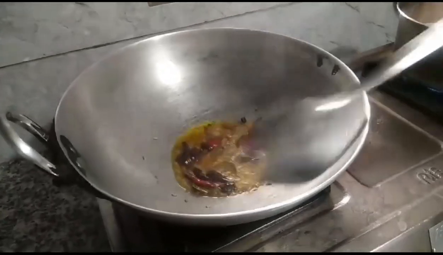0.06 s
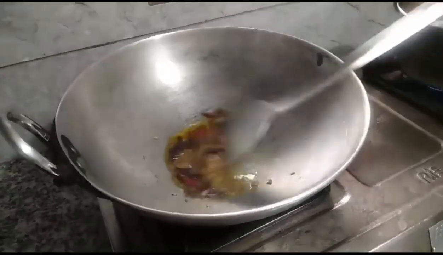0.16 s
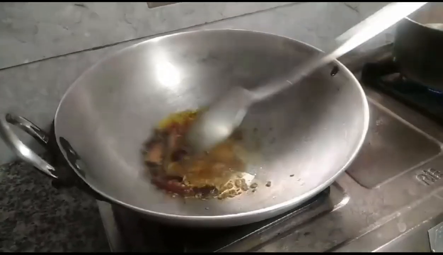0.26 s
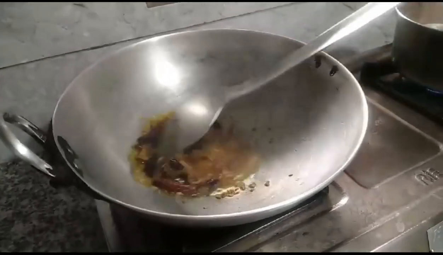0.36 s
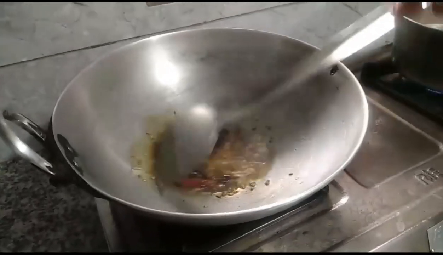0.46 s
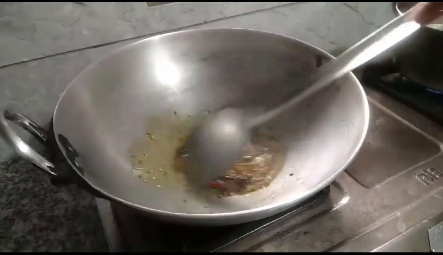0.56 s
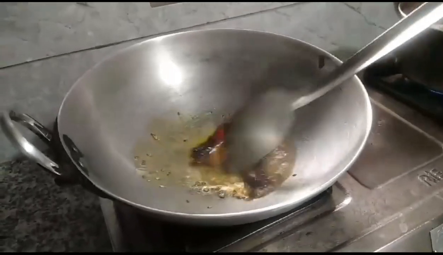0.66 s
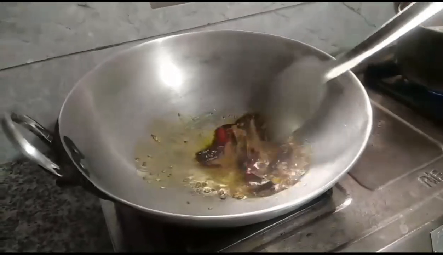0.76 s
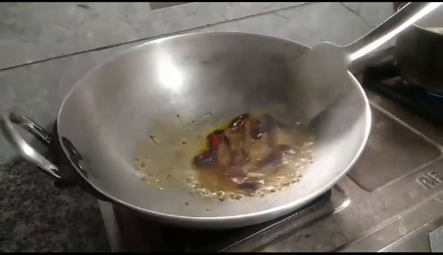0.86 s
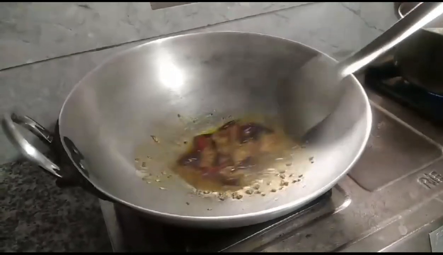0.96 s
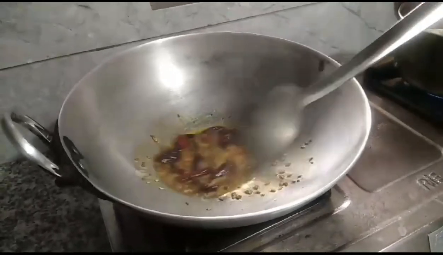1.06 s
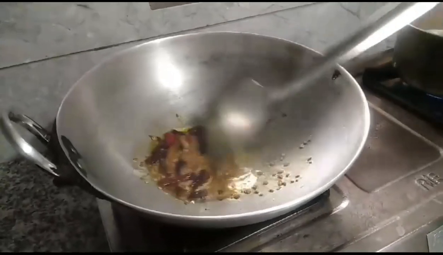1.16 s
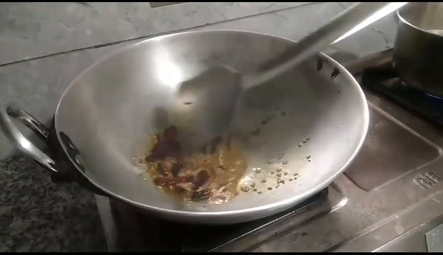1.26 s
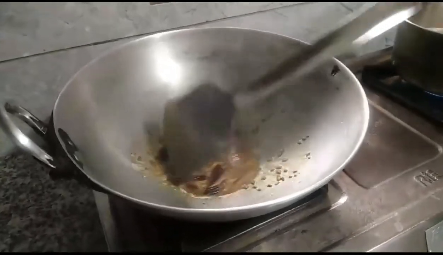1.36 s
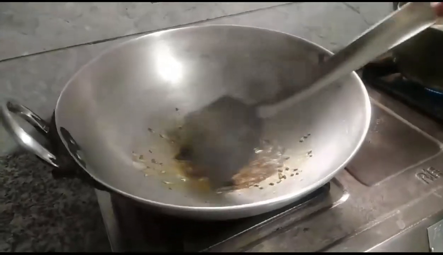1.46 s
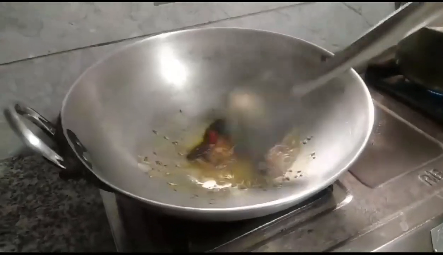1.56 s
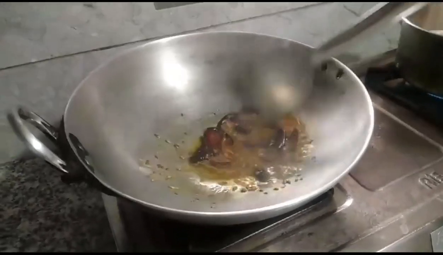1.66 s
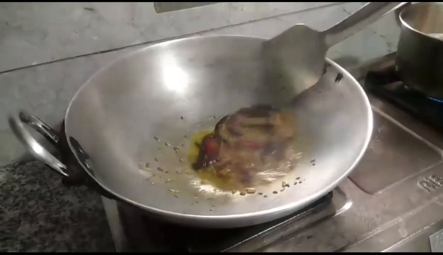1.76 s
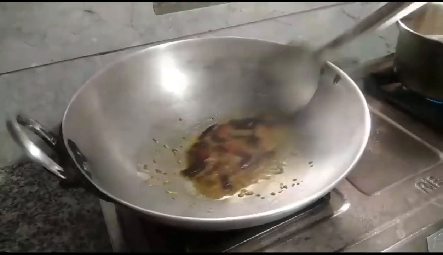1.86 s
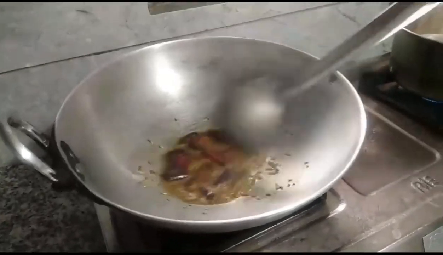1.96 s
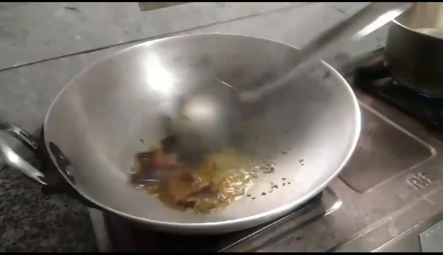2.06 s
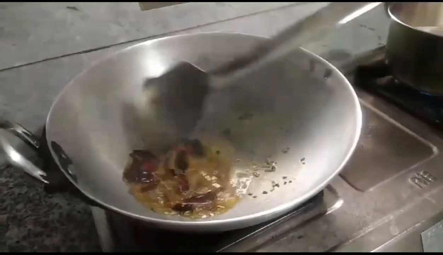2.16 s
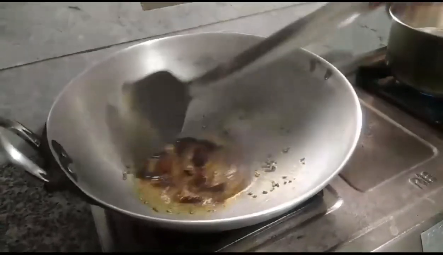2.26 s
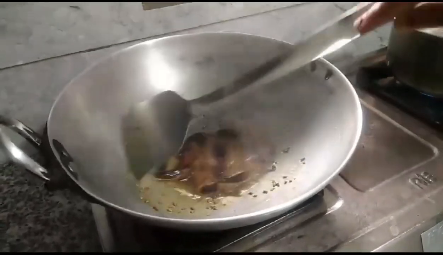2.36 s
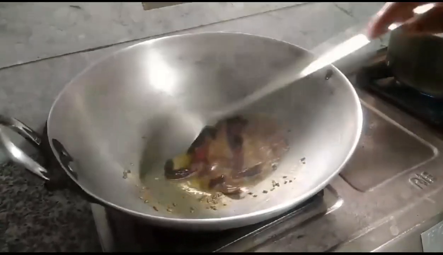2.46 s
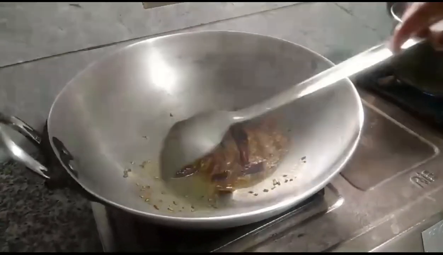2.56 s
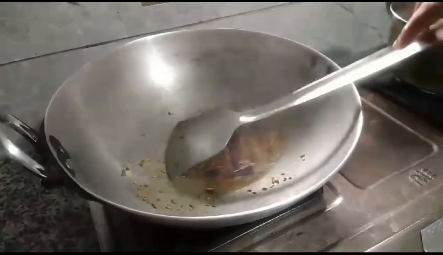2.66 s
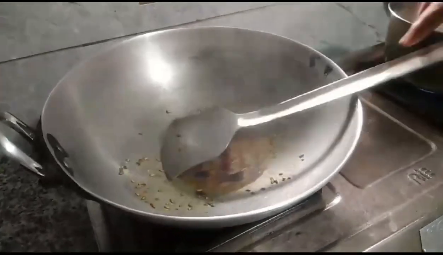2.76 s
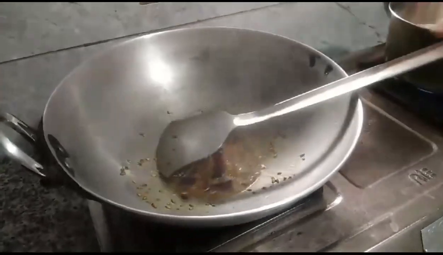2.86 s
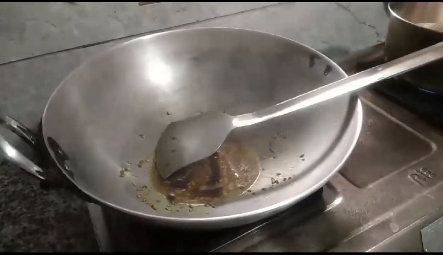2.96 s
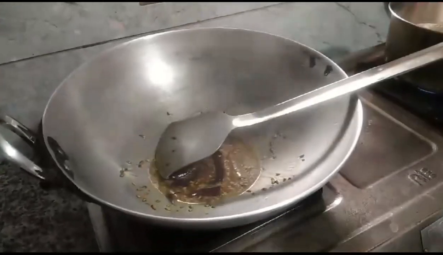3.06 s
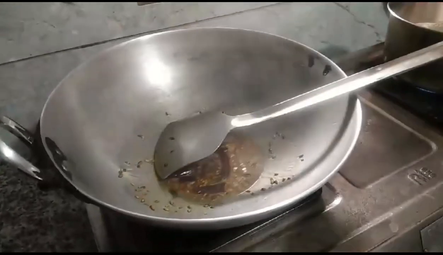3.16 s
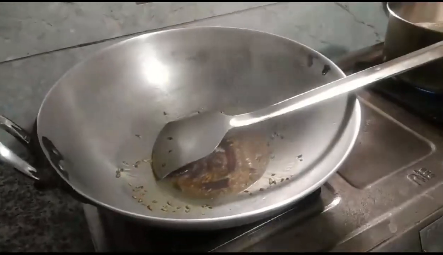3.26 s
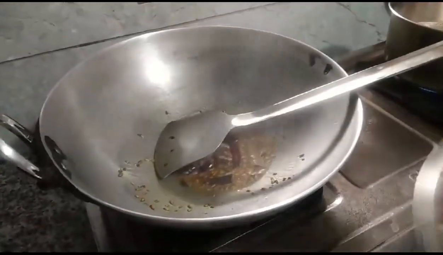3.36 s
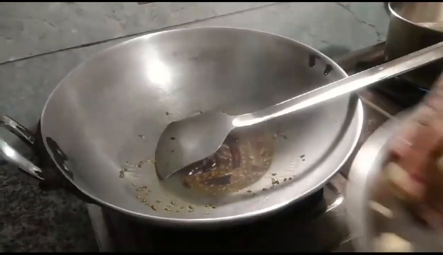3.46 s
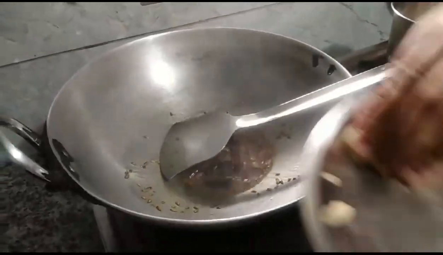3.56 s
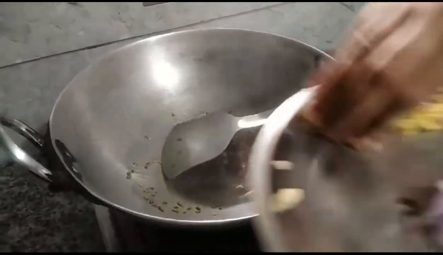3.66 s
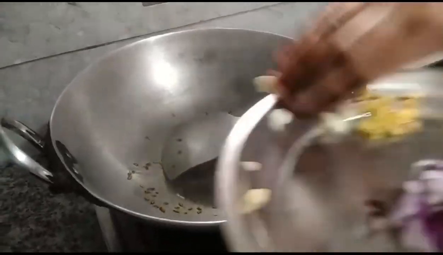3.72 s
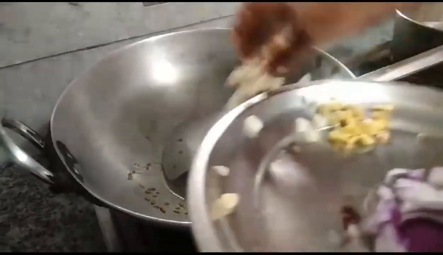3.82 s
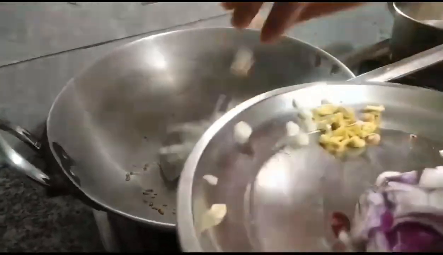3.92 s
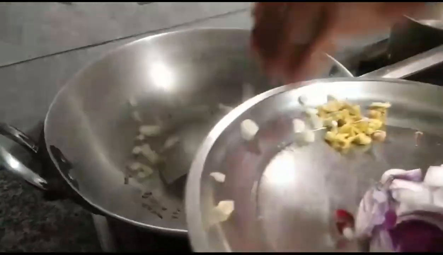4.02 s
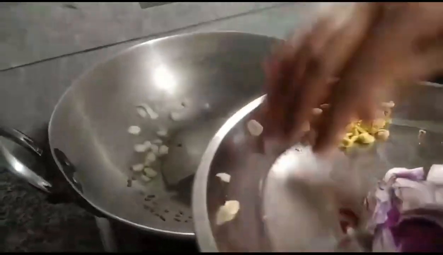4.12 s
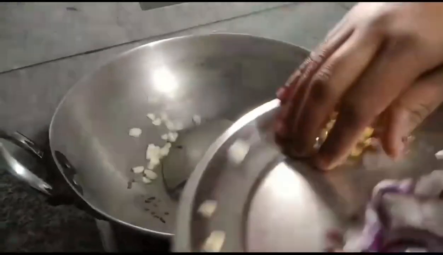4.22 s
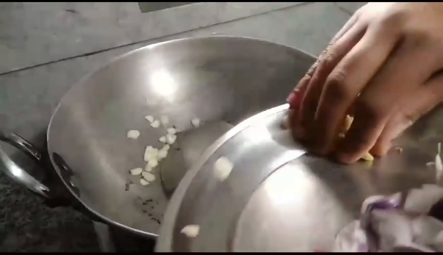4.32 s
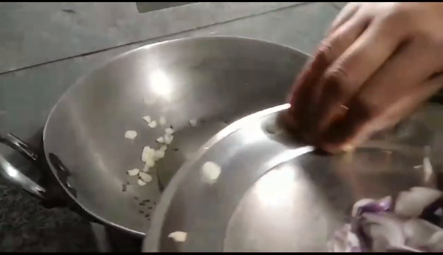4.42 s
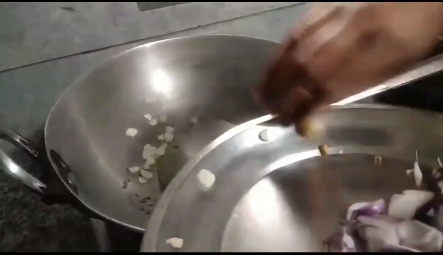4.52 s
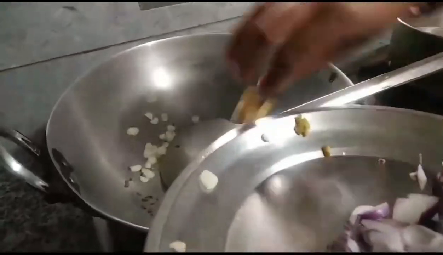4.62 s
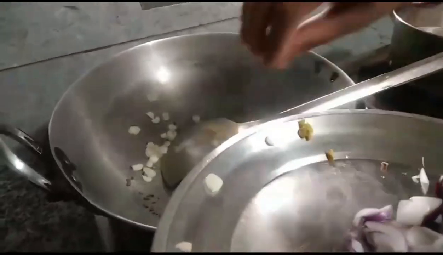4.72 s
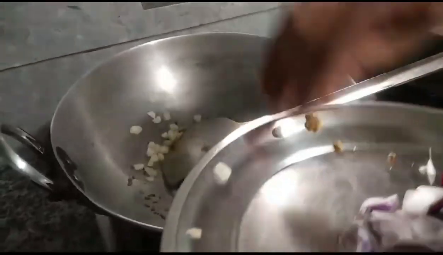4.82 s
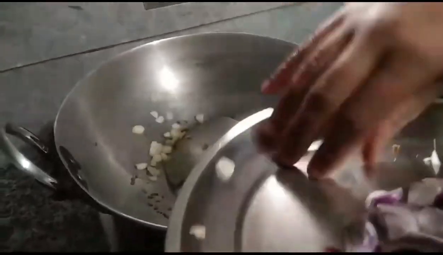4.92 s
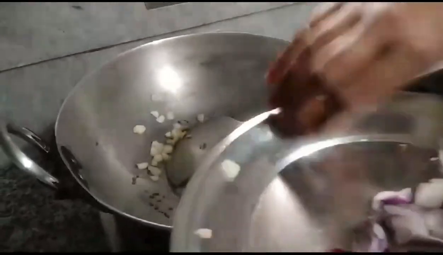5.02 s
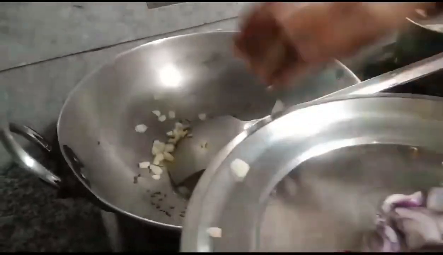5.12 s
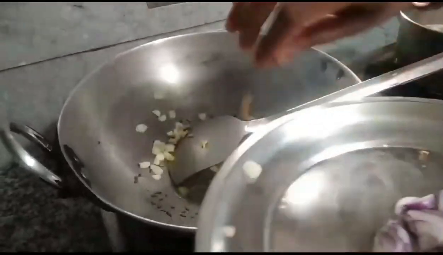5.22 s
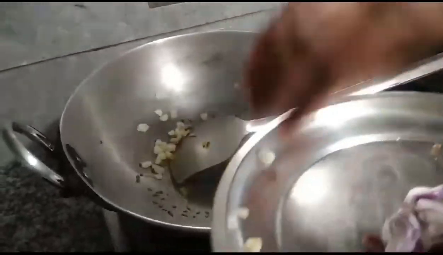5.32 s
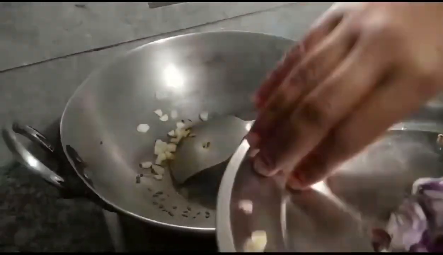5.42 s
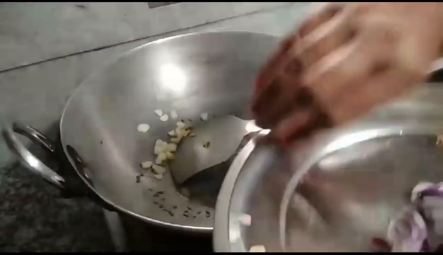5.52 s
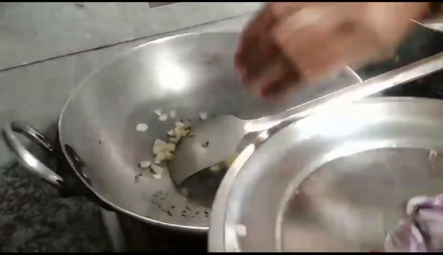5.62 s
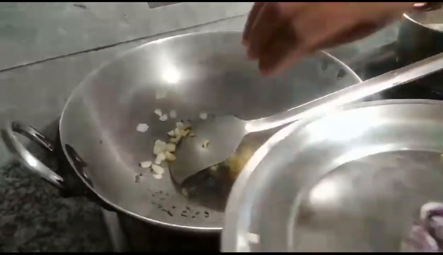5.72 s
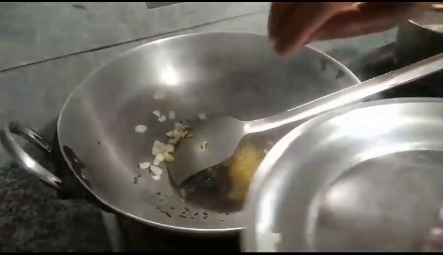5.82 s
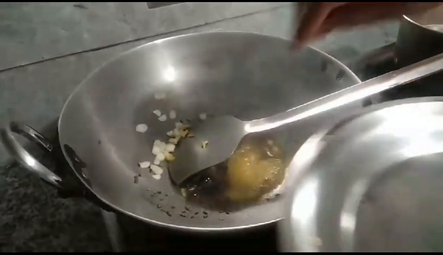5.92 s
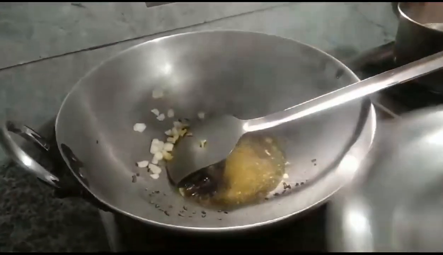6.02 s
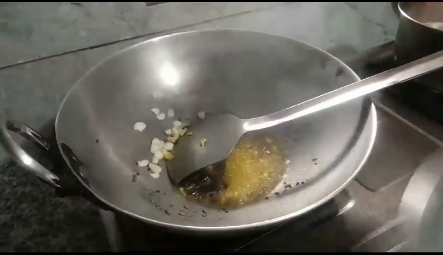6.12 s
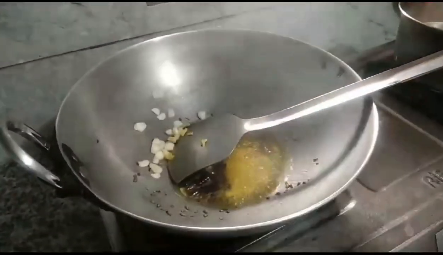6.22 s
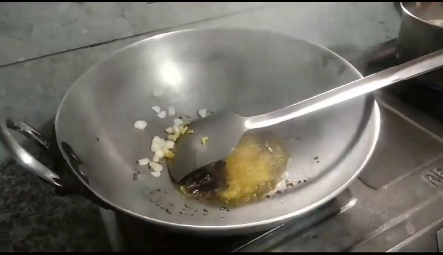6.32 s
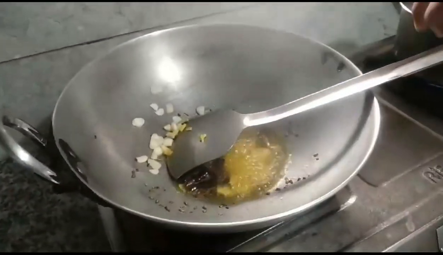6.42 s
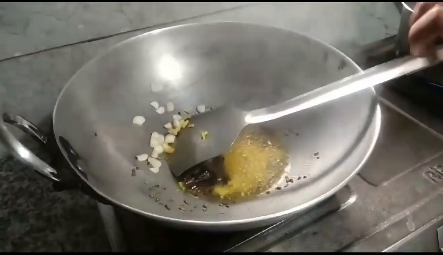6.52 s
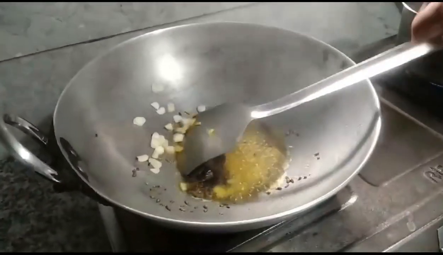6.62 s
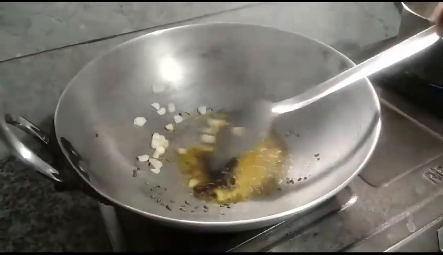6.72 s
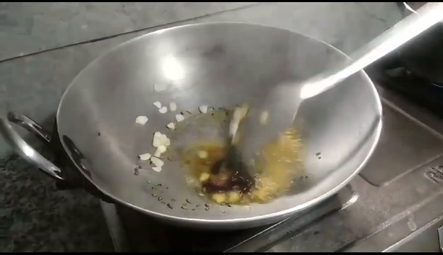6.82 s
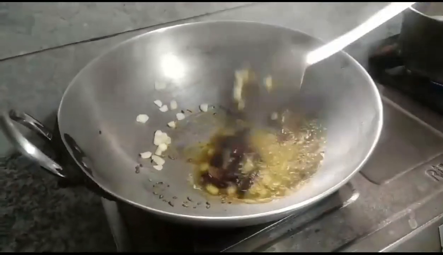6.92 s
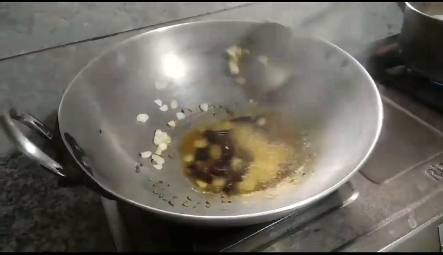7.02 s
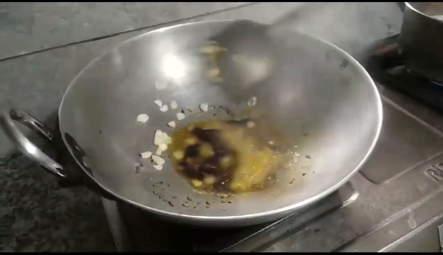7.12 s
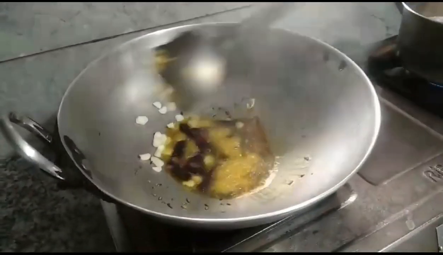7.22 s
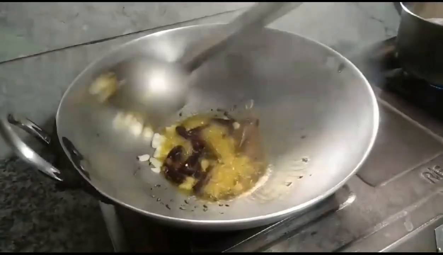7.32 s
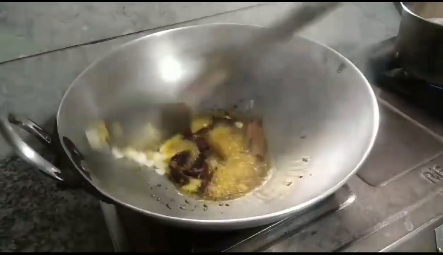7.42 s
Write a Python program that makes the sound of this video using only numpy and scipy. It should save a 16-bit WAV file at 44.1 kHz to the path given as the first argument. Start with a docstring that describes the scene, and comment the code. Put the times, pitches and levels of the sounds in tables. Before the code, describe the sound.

Close up in a small kitchen, a steel spatula stirs a wok with bright scrapes and clinks over fizzing, spitting oil. After a quick metallic rattle the spatula rests, and the frying swells in crackling bursts as chopped pieces fall in. Near the end a metal plate rasps and rings on the counter, then the spatula strikes and scrapes again. A faint low drone and burner rush lie behind everything.

```python
"""Spices sizzling in a steel wok on a gas burner, close to a stereo pair of microphones in a small kitchen.
Moisture boils in the hot oil as countless tiny bubbles; a steel spatula scrapes, knocks and is dropped
in the pan, ringing both bowl and blade. Chopped garlic and ginger patter in and the oil sizzles up.
A steel plate judders over the stone counter, and the stirring starts again.
Behind it all lie the low rush of the flame and the room, and a wavering drone."""
import sys
import numpy as np
from scipy import signal
from scipy.fft import rfft, irfft
from scipy.io import wavfile
from scipy.ndimage import uniform_filter1d

SR = 44100
rng = np.random.default_rng(int(sys.argv[2]) if len(sys.argv) > 2 else 0)


def wav_record(signal):
    """Record a signal, one row per channel, as 16-bit PCM in the file named by sys.argv[1]."""
    frames = np.transpose(np.atleast_2d(signal))
    bounded = np.clip(frames, -1, 1)
    # unit amplitude maps onto the largest positive 16-bit level
    quanta = np.round(bounded * 32767).astype(np.int16)
    wavfile.write(sys.argv[1], SR, quanta)


N = 329868


def amp(db):
    return 10 ** (np.asarray(db) / 20)


def unit_rms(x):
    return x / np.sqrt(np.mean(x ** 2) + 1e-20)


def curve_at(points, hz):
    """Joins (frequency, value) points by straight lines on a log-frequency axis."""
    f, value = np.transpose(points)
    return np.interp(np.log(hz + 1), np.log(f + 1), value)


def pan(db):
    """Gains that put the left microphone db above the right."""
    return amp(np.array([[db], [-db]]) / 2)


def add(mix, start_s, sound):
    part = mix[:, max(round(start_s * SR), 0):][:, :sound.shape[1]]
    part += sound[:, :part.shape[1]]


def decay(t, t60):
    return np.exp(-np.log(1000) * t / t60)


def swell(t, hold, rise, fall):
    """Grows until t = 0, holds, then dies away."""
    return np.exp(np.minimum(t, 0) / rise - np.maximum(t - hold, 0) / fall)


def tint(x, spectrum):
    """Colours a signal, at unit RMS; beyond the ends of the spectrum it falls away."""
    hz = np.fft.rfftfreq(x.shape[-1], 1 / SR)
    skirts = 1 / (1 + (hz / (2 * spectrum[-1][0])) ** 4) / (1 + (spectrum[0][0] / 2 / (hz + 1)) ** 4)
    return unit_rms(irfft(rfft(x) * amp(curve_at(spectrum, hz)) * skirts, x.shape[-1]))


def resonate(x, peaks, valley_db):
    """Broad resonances (frequency [Hz], width [Hz], level [dB]) standing over darker valleys."""
    hz = np.fft.rfftfreq(x.shape[-1], 1 / SR)
    power = sum(amp(db) ** 2 / (1 + ((hz - f) / width) ** 2 * 2) ** 2 for f, width, db in peaks)
    return unit_rms(irfft(rfft(x) * np.sqrt(power + amp(valley_db) ** 2), x.shape[-1]))


# How alike the room sounds at the two microphones: (frequency [Hz], coherence [0-1])
COHERENCE = [(20, 0.81), (60, 1), (300, 0.95), (640, 0.98), (1500, 0.082), (15000, 0.043)]
def diffuse(size):
    """White noise at two microphones: alike in the bass, unrelated in the treble."""
    a, b = rfft(rng.standard_normal((2, size)))
    same = np.clip(curve_at(COHERENCE, np.fft.rfftfreq(size, 1 / SR)), -1, 1)
    return irfft(np.array([a, same * a + np.sqrt(1 - same ** 2) * b]), size)


def clicks(size, per_s, spread_db):
    """Random clicks, mostly small with a few large ones."""
    height = amp(spread_db * np.minimum(rng.exponential(1, size), 5))
    return unit_rms(height * rng.choice([-1, 1], size) * (rng.random(size) < per_s / SR))


def grains(per_s, spread_db, pop_s, tail_s, tail_share):
    """Random tiny pops, each followed by a short wash of reflections."""
    t = np.arange(SR // 8) / SR
    energy = clicks(N, per_s, spread_db) ** 2
    pop, tail = np.exp(-t / pop_s), np.exp(-t / tail_s)
    envelope = (1 - tail_share) * pop / pop.sum() + tail_share * tail / tail.sum()
    power = signal.oaconvolve(energy, envelope)[:N]
    return diffuse(N) * np.sqrt(abs(power))


def ringing(modes, t, scatter_db=1.5):
    """Dying sines, weighted by the point of contact; high ones reach the microphones out of step."""
    out = np.zeros((2, len(t)))
    for hz, db, t60 in modes:
        phase = rng.random() + rng.uniform(-0.26, 0.56, (2, 1)) * (1 - curve_at(COHERENCE, hz))
        level = amp(db + scatter_db * rng.standard_normal())
        out += level * decay(t, t60) * np.sin(2 * np.pi * (hz * t + phase))
    return out


def contact_colour(x, ripple_db, spacing_hz):
    """The point of contact wakes some groups of modes and misses others."""
    hz = np.fft.rfftfreq(x.shape[-1], 1 / SR)
    groups = np.minimum(rng.standard_normal(400), 1)
    ripple = np.interp(hz / spacing_hz, np.arange(len(groups)), groups)
    return irfft(rfft(x) * amp(ripple_db * ripple * hz / (hz + 500)), x.shape[-1])


def shimmer(x, depth_db, width_hz, hold_s):
    """Narrow bands of pitch swell and fade at random, giving a patchy shimmer."""
    frames = signal.stft(x, nperseg=1024, noverlap=768)[2]
    field = rng.standard_normal(frames.shape[1:])
    for axis, span in enumerate([width_hz * 1024 / SR, hold_s * SR / 256]):
        field = uniform_filter1d(field, max(round(span), 1), axis=axis)
    gain = amp(depth_db * np.minimum(unit_rms(field), 2))
    return unit_rms(signal.istft(frames * gain, nperseg=1024, noverlap=768)[1][:, :x.shape[1]])


def off_centre(x, left_lag_s):
    """A sound from one side reaches one microphone a moment after the other."""
    t = np.arange(N) / SR
    return np.array([np.interp(t - round(left_lag_s * SR) / SR, t, x[0]), x[1]])


# Room tone with the gas flame: (frequency [Hz], level [dB])
ROOM_TONE = [(22, -2), (40, 4), (75, 3.5), (120, -2), (200, -10.5), (300, -9.5), (390, -7), (600, -5.5),
             (1100, -18), (2500, -16.5), (5000, -18.5)]
# Swells of the low drone: (time [s], hold [s], level [dB], pitch [Hz])
DRONE_SWELLS = [(0.028, 0.035, -51.5, 58.6), (0.96, 0.063, -47.5, 62.6), (2.54, 0.073, -57.5, 64),
                (3.228, 0.417, -60.5, 69.5), (6.48, .02, -63, 63)]
def background(drone_hz=61, drone_db=-76, waver_rad=0.41, room_db=-60, hum_hz=380, hum_db=-69):
    """A drone wavers and swells over the rush of flame and room; a faint hum comes and goes above it."""
    t = np.arange(N) / SR
    flutter, drift = tint(rng.standard_normal((2, N)), [(2, -2), (7, 7), (20, -14)])
    swells = [(amp(db) * swell(t - s, hold, rise=0.057, fall=0.322), hz)
              for s, hold, db, hz in DRONE_SWELLS]
    level = amp(drone_db) + sum(size for size, hz in swells)
    pitch = drone_hz + sum(size * (hz - drone_hz) for size, hz in swells) / level
    drone = np.sqrt(2) * level * np.sin(2 * np.pi * np.cumsum(pitch) / SR + waver_rad * drift)
    hum = amp(hum_db) * resonate(diffuse(N), [(hum_hz, 14, 0)], valley_db=-80)
    room = amp(room_db) * tint(diffuse(N), ROOM_TONE)
    return drone * (1 + 0.54 * flutter) + hum + room


# Wok on burner, plate on counter, mid-image: (time [s], pitch [Hz], level [dB], t60 [s], rise [s])
BUMPS = [(0.036, 660, -39, 0.069, .002), (0.035, 382, -45, 0.15, .002), (0.048, 161.7, -61.5, 0.96, .002),
         (0.15, 1580, -57, 0.74, .005), (0.293, 1183, -58, .35, .002), (1.511, 174.7, -56.5, 1, .002),
         (2.43, 230, -60, 0.13, .002), (2.81, 31.9, -46, 0.23, .002), (2.885, 263, -38, 0.18, .004),
         (3.344, 810, -38, 0.039, 0.0017), (4.569, 156, -47, 0.09, .002), (5.905, 616, -30, 0.087, 0.0043),
         (5.93, 146.3, -45.5, 0.5, .002), (6.05, 244, -39, 0.22, .004), (6.363, 435.4, -28.5, 0.36, 0.02),
         (7.125, 710, -47.5, 0.98, .002), (7.124, 162, -57, 0.44, .004)]
def bumps(rattle=0.55):
    """A soft blow sets off one low, slightly rattling resonance."""
    out, t = np.zeros((2, N)), np.arange(SR) / SR
    for s, hz, db, t60, rise in BUMPS:
        noise = tint(diffuse(SR), [(hz / 2, -25), (hz, 0), (hz * 2, -25)])
        tone = np.sin(2 * np.pi * hz * t) + rattle * noise
        add(out, s, amp(db) * tone * decay(t, t60) * (1 - np.exp(-t / rise)))
    return out


# The plate's body, fine stone grit under its rim, and coarser grains: (frequency [Hz], level [dB])
PLATE_BODY = [(60, -30), (130, -6), (250, 2.5), (4500, 1), (7000, 6)]
GRIT = [(2500, -27), (4500, -33), (6500, 12), (9000, 17), (14000, -19)]
RASP = [(500, -3.5), (1500, -24), (2500, -3), (4500, -4), (9000, -7.5)]
# Its resonances, damped by hand and food: (frequency [Hz], width [Hz], level [dB])
PLATE_DAMPED_MODES = [(147, 22, 1), (275, 20, 1.5), (437, 31, 1), (579, 44, 3), (660, 110, -0.5),
                      (890, 71, -6), (1060, 124, -1.5), (1362, 53, 6), (1680, 134, 1), (1970, 35, 0.5),
                      (2092, 90, 1.5), (2414, 34, 6), (2590, 31, 4), (2740, 16, 6), (3083, 100, 1.5),
                      (3536, 50, 4), (3900, 63, 3), (4170, 45, 4), (4500, 330, -5.5), (4880, 62, -2),
                      (5090, 50, 2.5)]
# Its modes that ring on: (frequency [Hz], level [dB], t60 [s])
PLATE_RINGING_MODES = [(812, 0.5, 0.99), (1066, 0, 0.43), (1370, 11.5, 0.22), (1677, 14, 0.25),
                       (2406, 8.5, 0.18), (2570, 10, .2)]
# Pushes along the counter, to the left: (time [s], hold [s], relative level [dB], rise [s], fall [s])
PUSHES = [(5.917, 0.018, -31.5, 0.013, 0.1), (6.028, 0.12, -33, 0.054, 0.12),
          (6.476, 0.055, -26.5, 0.043, 0.068)]
def plate(body_db=2, ring_db=-11, grit_db=-1, rasp_db=-7, grit_growth=1.85):
    """The rim judders over the stone; the harder the push, the more the grit rasps and hisses."""
    t = np.arange(N) / SR
    push = np.max([amp(db) * swell(t - s, hold, rise, fall) for s, hold, db, rise, fall in PUSHES], 0)
    judder = grains(per_s=350, spread_db=1.4, pop_s=0.0006, tail_s=0.008, tail_share=0.82)
    contact = shimmer(judder, depth_db=3, width_hz=90, hold_s=0.1)
    body = tint(resonate(contact, PLATE_DAMPED_MODES, valley_db=-12.5), PLATE_BODY) * push * amp(body_db)
    response = ringing(PLATE_RINGING_MODES, t[:SR])
    response /= np.linalg.norm(response[0])
    ring = signal.oaconvolve(judder * push * amp(ring_db), response, axes=1)[:, :N]
    grinding = push.max() * (push / push.max()) ** grit_growth
    grit = (amp(grit_db) * tint(judder, GRIT) + amp(rasp_db) * tint(judder, RASP)) * grinding
    return pan(4) * (body + ring) + pan(3) * grit


# Chopped pieces dropping into the wok: (time [s], length [s], level [dB])
SPILLS = [(0.523, 0.099, -54), (3.929, .04, -55.5), (3.986, 0.059, -54.5), (4.747, 0.037, -55)]
# Their taps on the steel: (frequency [Hz], level [dB])
TAP_SPECTRUM = [(250, -23), (550, 3), (900, -1), (1300, -1.5), (2200, 4), (4000, -18)]
def patter(rise=0.0065, fall=0.059):
    """Soft pieces land one after another, each with a dull little tap."""
    t = np.arange(N) / SR
    taps = grains(per_s=170, spread_db=1, pop_s=0.002, tail_s=0.014, tail_share=0.6)
    taps = contact_colour(taps, ripple_db=5, spacing_hz=90)
    pouring = sum(amp(db) * swell(t - s, length, rise, fall) for s, length, db in SPILLS)
    return pan(3) * tint(taps, TAP_SPECTRUM) * pouring


# The free spatula's modes: (frequency [Hz], level [dB], t60 [s])
BLADE_MODES = [(1828, -9, .36), (1880, -12, .28), (2110, -8, .2), (2573, -15, .2), (2720, -16, .2),
               (3447, -7, .28), (3720, -10, .18), (3950, -4, .34), (3995, -6, .26), (4425, -6, .25),
               (4678, -6, .28), (4930, -5, .22), (5090, -6, .2), (5240, -3, .26), (5755, -2, .3),
               (5960, -1, .18), (6300, 0, .25), (6570, -1, .2), (6740, -1, .18), (7275, 8, .2),
               (7820, 4, .22), (7957, 3, .22), (8300, 6, .2), (8660, 5, .2), (9535, 8, .22),
               (10220, 0, .16), (10780, 1, .16), (11340, -2, .2)]
# It springs clear of the wok; the spot struck favours one group of modes:
# (time [s], level [dB], low modes re high [dB], favoured frequency [Hz], favoured by [dB])
BLADE_RINGS = [(0.034, -32, -1, 7280, 3), (0.999, -37.5, -2, 7900, 2), (1.505, -40.5, -4.5, 5160, 16.5),
               (1.887, -40, -1, 6000, 4), (2.428, -39, -10, 4800, 17), (2.806, -32, -1, 6330, 6),
               (2.856, -44, 9, 6300, 5), (7.118, -29.5, 1, 8850, -20)]
def blade(rise=0.0021, chatter_db=-1, chatter_t60=0.29, favoured_width_hz=210):
    """The spatula's own partials: clear tones, blurred by its chatter on the wok."""
    out, t = np.zeros((2, N)), np.arange(SR // 2) / SR
    for s, db, low_db, favoured_hz, favoured_db in BLADE_RINGS:
        modes = []
        for hz, level, t60 in BLADE_MODES:
            tilt_db = curve_at([(4000, low_db), (7000, 0)], hz)
            boost_db = favoured_db * np.exp(-((hz - favoured_hz) / favoured_width_hz) ** 2)
            modes.append((hz, level + tilt_db + boost_db, t60))
        tones_rms = np.sqrt(sum(amp(level) ** 2 for _, level, _ in modes) / 2)
        peaks = [(hz, 30 + 0.008 * hz, level) for hz, level, _ in modes]
        chatter = resonate(diffuse(len(t)), peaks, valley_db=-30) * decay(t, chatter_t60)
        sound = ringing(modes, t) + amp(chatter_db) * tones_rms * chatter
        add(out, s, amp(db) * sound * (1 - np.exp(-t / rise)))
    return out * pan(1)


# The wok's strong modes with the spatula on it: (frequency [Hz], level [dB], t60 [s])
WOK_MODES = [(382, 0, .28), (445, -3, .18), (560, -3, .18), (668, 1, .2), (797, -3, .14), (880, -4, .14),
             (1020, -3, .16), (1170, -6, .14), (1400, -7, .2), (1835, -5, .16), (2250, -2, .12),
             (2490, -2, .16), (2650, -1, .2), (2820, -1, .2), (3060, -3, .16), (3450, -5, .16),
             (3957, -3, .16), (4400, -4, .18), (4650, -6, .2), (4850, -8, .2), (5250, -9, .2),
             (6295, -5, .3), (6433, -7, .3), (6907, 2, .3), (7252, -2, .32), (8086, -3, .34),
             (8360, -5, .3), (8690, -4, .3), (8786, 1, .32), (9259, -7, .36), (9790, -7, .3),
             (10710, -9, .36), (11110, -9, .3), (11800, -5, .3), (12970, -13, .3)]
# Its crowded weaker modes, in three registers: (frequency [Hz], level [dB])
BOOM = [(40, -19), (150, -4), (290, -22), (380, -3.5), (700, -4.5), (1050, -1.5), (1500, -2), (2500, -46)]
CLANG = [(900, -34), (1400, -10.5), (1850, -1), (2800, -4), (3500, 0.5), (4500, -2.5), (6000, -17.5)]
RING = [(3000, -62), (4200, -20), (4900, -11.5), (5700, -2.5), (7000, -2), (8300, 1), (9800, -2),
        (11500, -6.5), (14000, -10.5)]
def wok(boom_db, clang_db, tones_db, boom_t60=0.28, clang_t60=0.25, ring_t60=0.21):
    """The steel's answer to one blow: the boom of a heavy one, the high ring of a glancing one."""
    t = np.arange(SR // 2) / SR
    # weaker modes cluster around each strong one, and shift with the place where the blade presses
    clusters = [(hz * rng.uniform(0.988, 1.012), 38 + 0.016 * hz, db) for hz, db, _ in WOK_MODES]
    steel = contact_colour(diffuse(len(t)), ripple_db=4.8, spacing_hz=55)
    low, high = resonate(steel, clusters, valley_db=-16), resonate(steel, clusters, valley_db=-2)
    registers = [(low, BOOM, boom_db, boom_t60), (low, CLANG, clang_db, clang_t60),
                 (high, RING, 0, ring_t60)]
    echo = amp(-19) * decay(t, t60=0.2)
    crowd = sum(amp(db) * tint(x, shape) * np.hypot(decay(t, t60), echo)
                for x, shape, db, t60 in registers)
    weight = [(1400, boom_db + 2), (1800, clang_db + 7), (4200, clang_db + 6), (4800, -1)]
    modes = [(hz, db + curve_at(weight, hz), t60) for hz, db, t60 in WOK_MODES]
    return (crowd + amp(tones_db) * ringing(modes, t)) * (1 - np.exp(-t / 0.0003))


# Spatula strokes, near the middle of the image:
# (time of hardest push [s], level [dB], rise [s], boom re ring [dB], clang re ring [dB])
SCRAPES = [(0.039, -17, 0.0054, -30, -50), (0.975, -33, 0.029, -37, -9),
           (1.895, -21.5, 0.019, -29.5, -19.5), (1.965, -29.5, 0.024, -30, -11),
           (2.025, -32.5, 0.04, -26, -11), (2.579, -28, 0.019, -15, -7.5), (2.647, -36, 0.012, -11, -5),
           (2.88, -32, 0.037, -0.5, -6), (2.992, -29.5, 0.03, -13.5, -9), (3.655, -41.5, 0.017, -24, -7),
           (7.126, -17.5, 0.0075, -21, -11.5), (7.31, -32.5, 0.048, -20.5, -30),
           (7.445, -30, 0.057, -16, -17.5)]
def scrapes(fall_per_rise=0.17):
    """The blade skids over the steel: a swelling and fading run of tiny slips rings the wok."""
    out = np.zeros((2, N))
    for s, db, rise, boom_db, clang_db in SCRAPES:
        fall = fall_per_rise * rise
        t = np.arange(-4 * rise, 4 * fall, 1 / SR)
        slips = clicks(SR, per_s=1600, spread_db=3)[:len(t)]
        force = slips * swell(t, 0, rise, fall)
        sound = signal.fftconvolve(force[None], wok(boom_db, clang_db, tones_db=-26), axes=1)
        peak_rms = np.sqrt(uniform_filter1d((sound ** 2).mean(0), size=441).max())
        add(out, s + t[0], amp(db) * sound / peak_rms)
    return out * pan(1)


# A bare contact at close range: (frequency [Hz], level [dB])
TICK_SPECTRUM = [(2500, -27), (5000, -22), (8500, 10.5), (11000, -1.5), (14400, 3)]
def tick(fall):
    """A burst of noise so short that it is heard as a bright click."""
    t = np.arange(-32, 480) / SR
    burst = diffuse(len(t)) * (t >= 0) * np.exp(-abs(t) / fall)
    return tint(burst, TICK_SPECTRUM) * burst.std()


# Spatula blows on the wok, close to the microphones:
# (time [s], relative level [dB], boom re ring [dB], clang re ring [dB], clear tones re ring [dB])
KNOCKS = [(0.156, -31.5, -25, -15, -24), (1.001, -27.5, -30, -23, -24), (1.4377, -32.5, -50, -25, -26),
          (1.5043, -25, -12, -17, -23), (1.6338, -43, -39, -16, -24), (2.212, -32.5, -53, -20.5, -19),
          (2.428, -16.5, -14.5, -17.5, -30), (2.516, -34, -24, -16, -21), (2.8066, -14.5, -24, -10.5, -16),
          (2.8397, -18, -22.5, -12, -10.5), (2.8554, -16.5, -27, -10, -13),
          (2.8885, -17.5, -25, -11.5, -18), (2.909, -22.5, -14.5, -16, -24),
          (2.9326, -22.5, -19.5, -12.5, -25), (2.9672, -24, -28, -10, -31),
          (3.1726, -38.5, -22.5, -12, -28), (3.3434, -49.5, -6.5, 4, -19), (3.554, -52, -16, -21, -20),
          (3.6198, -44.5, -19.5, -8.5, -8.5), (3.734, -40, -44, -15, -25), (6.9645, -28.5, -31, -9.5, -28),
          (7.1196, -21.5, -25, -15, -24)]
def knocks(ring_gain_db=4, tick_gain_db=1, skid_db=-3, skid_s=0.0022):
    """Steel meets steel: a hard tick, the blade chatters for an instant, and the wok rings."""
    out, t = np.zeros((2, N)), np.arange(1024) / SR
    for s, db, boom_db, clang_db, tones_db in KNOCKS:
        skid = clicks(SR, per_s=3000, spread_db=2)[:len(t)] * t * np.exp(-t / skid_s)
        force = (t == 0) + amp(skid_db) * skid / np.linalg.norm(skid)
        force /= np.linalg.norm(force)
        ring = signal.fftconvolve(force[None], wok(boom_db, clang_db, tones_db), axes=1)
        add(out, s, amp(db + tick_gain_db) * tick(fall=0.0006))
        add(out, s, amp(db + ring_gain_db) * ring)
    return out * pan(2.5)


# Wet food meeting hot oil and steel: (time [s], relative level [dB], pitch [Hz])
SPLATS = [(0.291, -34, 4200), (0.475, -41, 2950), (0.612, -47, 2460), (0.661, -44, 9200), (.73, -51, 2150),
          (.748, -35.5, 9100), (0.907, -36.5, 2920), (1.153, -39, 8000), (1.194, -38.5, 2570),
          (1.785, -52, 3520), (4.068, -50, 3220), (4.186, -29.5, 8000), (4.276, -30, 9300),
          (4.33, -26.5, 9500), (4.437, -44, 9000), (4.519, -28.5, 8800), (4.555, -27, 8800),
          (4.615, -32, 8800), (4.765, -35, 8800), (4.82, -35, 8800), (4.874, -25.5, 9000),
          (4.919, -28.5, 9200), (5.038, -36.5, 1980), (5.044, -27.5, 8750), (5.138, -28, 8550),
          (5.243, -32, 8850), (5.25, -40.5, 1840), (5.314, -37, 8500), (5.405, -27, 9300),
          (5.495, -31.5, 8600), (5.559, -29, 8300), (5.611, -35.5, 5150), (5.693, -35, 3760),
          (5.773, -45, 8600), (6.307, -29, 8950), (7.406, -36, 4230)]
def splats(gain_db=2, rise=0.0026, fall=0.027):
    """Water from the food flashes to steam in a short, crackling rush of bubbles."""
    out, t = np.zeros((2, N)), np.arange(SR // 4) / SR
    crackle = grains(per_s=2500, spread_db=1.8, pop_s=0.0003, tail_s=0.006, tail_share=0.7)
    for s, db, hz in SPLATS:
        bubbles = crackle[:, rng.integers(N - len(t)):][:, :len(t)]
        rush = tint(bubbles, [(hz / 6, -28), (hz / 2, -13), (hz * 0.68, -6), (hz, 0),
                              (hz * 1.48, -8), (hz * 4.8, -17), (hz * 3, -26)])
        add(out, s, amp(db + gain_db) * rush * (1 - np.exp(-t / rise)) * np.exp(-t / fall))
    return pan(3) * out


# Single drops of oil bursting close by: (time [s], level [dB])
SPITS = [(0.157, -12.5), (0.1638, -22), (0.653, -22), (1.437, -12), (1.635, -17), (3.176, -19.5),
         (3.467, -41), (3.52, -45), (3.74, -22), (4.155, -22), (4.187, -21), (4.197, -30), (4.437, -18.5),
         (5.411, -21), (5.509, -27), (6.3584, -14), (7.408, -14)]
def spits(echo_s=0.0037, echo_db=-3, spray_db=-16, spray_s=0.032):
    """A drop bursts: a snap on the right, its echo off the tiled wall on the left, a fizz of spray."""
    out, t = np.zeros((2, N)), np.arange(SR // 4) / SR
    for s, db in SPITS:
        add(out, s, amp(db) * pan(-10) * tick(fall=0.0005))
        add(out, s + echo_s, amp(db + echo_db) * pan(14) * tick(fall=0.0008))
        add(out, s, amp(db + spray_db) * tint(diffuse(len(t)), FIZZ) * np.exp(-t / spray_s))
    return out


# Fine and coarse bubbles in the oil, heard from beside the wok: (frequency [Hz], level [dB])
FIZZ = [(2500, -24), (4000, -15), (5500, -14), (7000, -8.5), (8200, -1), (9200, -1), (10500, -6.5),
        (12000, -10), (14400, -11)]
SPUTTER = [(200, -37), (500, -13), (1000, -10), (1600, -2.5), (2400, -1), (3500, 2), (4600, 2), (6500, 5.5),
           (10000, -54)]
# Moisture reaches the oil as spices are stirred, garlic and ginger go in, and all is stirred again:
# (time [s], length [s], relative fizz level [dB], relative sputter level [dB])
WETTINGS = [(0.0, 0.14, -38.5, -47), (0.35, 2.21, -40, -57), (4.012, 1.97, -40, -53.5),
            (4.07, 0.55, -38, -51), (4.203, 3.75, -33, -53), (4.712, 3.2, -58, -46),
            (7.344, .2, -30.5, -68)]
def sizzle(gain_db=2, surge_db=0.43, drying_db_per_s=1.08, flares_per_s=24, flare_db=-5.5, flare_s=0.033):
    """Thousands of bubbles burst each second, in uneven surges, loudest while moisture lasts."""
    t = np.arange(N) / SR
    fizz_power, sputter_power = amp(-57) ** 2, amp(-68) ** 2  # the oil left alone
    for s, length, fine_db, coarse_db in WETTINGS:
        drying = amp(-drying_db_per_s * np.maximum(t - s, 0))
        boiling = swell(t - s, length, rise=0.036, fall=0.078) * drying
        fizz_power += (amp(fine_db) * boiling) ** 2
        sputter_power += (amp(coarse_db) * boiling) ** 2
    surge = amp(surge_db * tint(rng.standard_normal(N), [(4, 18.5), (20, -7), (60, -59)]))
    flare_starts = rng.random(N) < flares_per_s / SR
    flares = signal.lfilter([1], [1, -np.exp(-1 / (flare_s * SR))], flare_starts)
    fine = grains(per_s=3000, spread_db=4.2, pop_s=0.0003, tail_s=0.008, tail_share=0.75)
    coarse = grains(per_s=700, spread_db=2.8, pop_s=0.0008, tail_s=0.014, tail_share=0.84)
    # the bowl colours the coarse bubbles
    coarse = resonate(coarse, [(hz, 25 + 0.018 * hz, db) for hz, db, _ in WOK_MODES], valley_db=-9)
    fine = shimmer(fine, depth_db=2, width_hz=220, hold_s=0.03)
    coarse = shimmer(coarse, depth_db=2.5, width_hz=260, hold_s=0.035)
    fizz = tint(fine, FIZZ) * np.sqrt(fizz_power)
    sputter = tint(coarse, SPUTTER) * np.sqrt(sputter_power) * (1 + amp(flare_db) * flares)
    return amp(gain_db) * surge * (pan(2) * fizz + pan(3) * sputter)


def scene():
    """The stove reaches the right microphone first, the plate on the counter the left one."""
    stove = knocks() + scrapes() + blade() + splats() + patter() + spits() + sizzle()
    counter = off_centre(plate(), left_lag_s=-0.0002)
    return off_centre(stove, left_lag_s=0.00025) + counter + bumps() + background()


# The left microphone's response re the right one's: (frequency [Hz], level [dB])
MIC_BALANCE = [(60, 0.5), (125, -2.5), (250, -1), (500, -1.5), (1000, -1.5), (2200, 2.7), (4500, -1.2),
               (8500, 0.5), (14000, 1.3)]
def record(dry, cutoff_hz=14280):
    """The two microphones' slightly different colours, then the band limit."""
    lean_db = curve_at(MIC_BALANCE, np.fft.rfftfreq(N, 1 / SR))
    heard = irfft(rfft(dry) * amp(np.array([lean_db, -lean_db]) / 2), N)
    lowpass = signal.firwin(511, cutoff_hz, window=("kaiser", 8), fs=SR)
    return signal.oaconvolve(heard, lowpass[None], "same")


dry = scene()
out = record(dry)
wav_record(out)
```